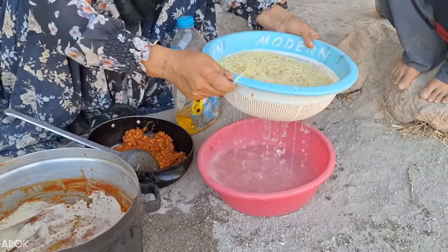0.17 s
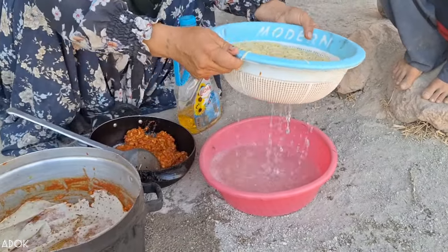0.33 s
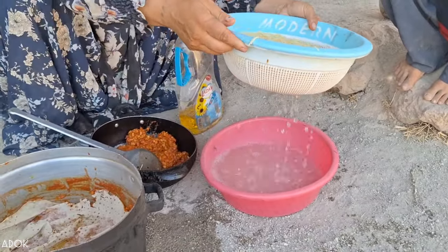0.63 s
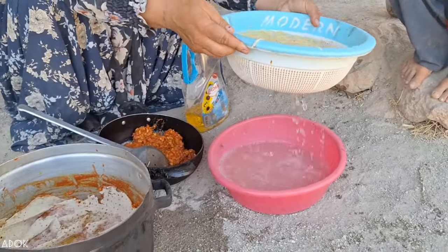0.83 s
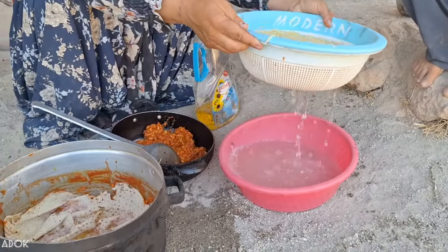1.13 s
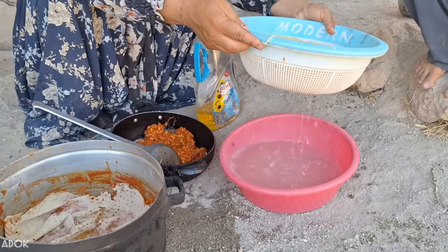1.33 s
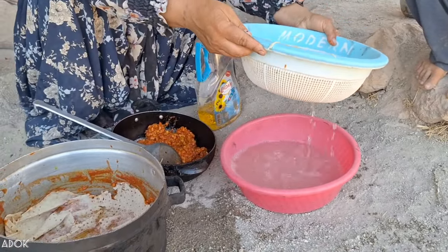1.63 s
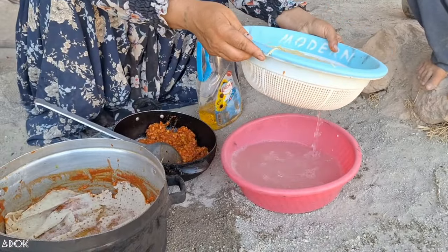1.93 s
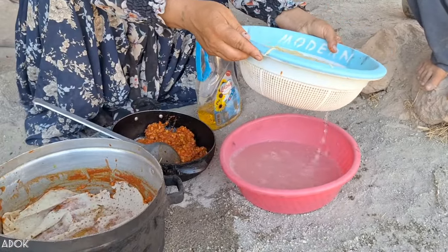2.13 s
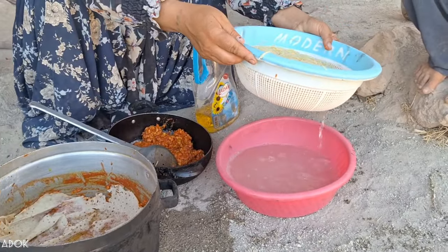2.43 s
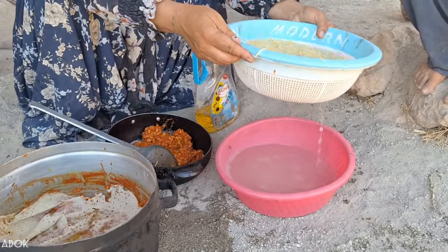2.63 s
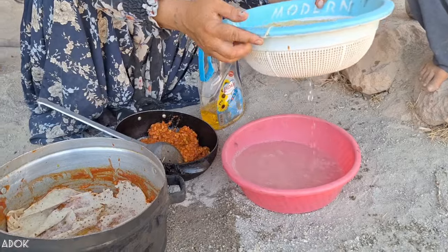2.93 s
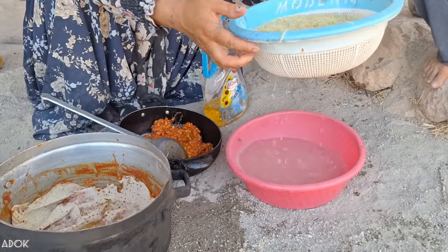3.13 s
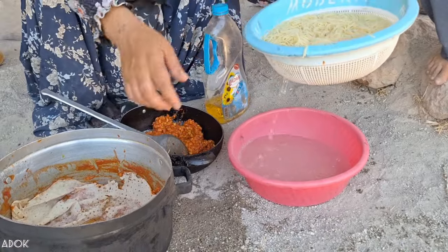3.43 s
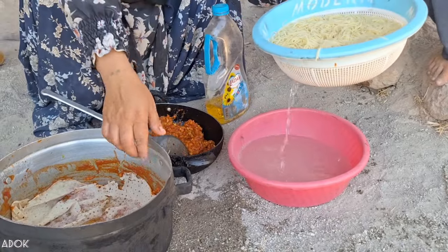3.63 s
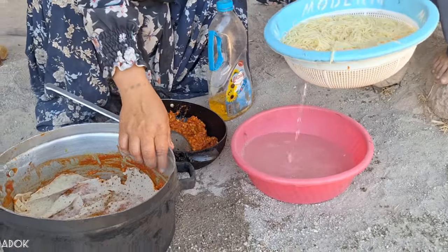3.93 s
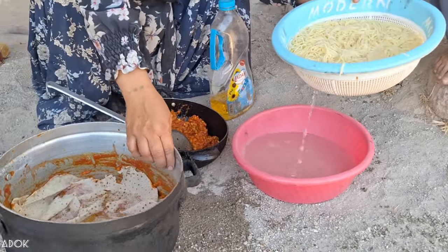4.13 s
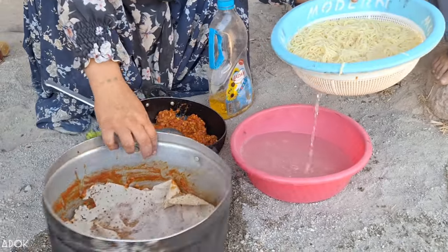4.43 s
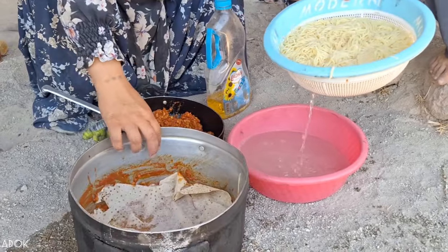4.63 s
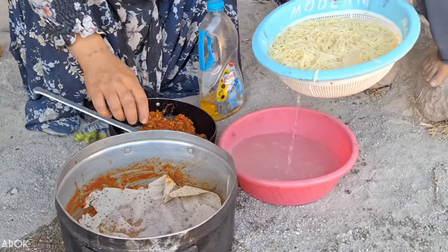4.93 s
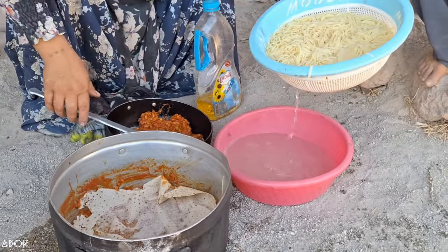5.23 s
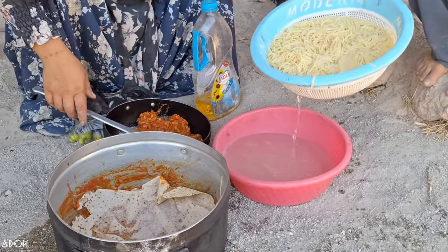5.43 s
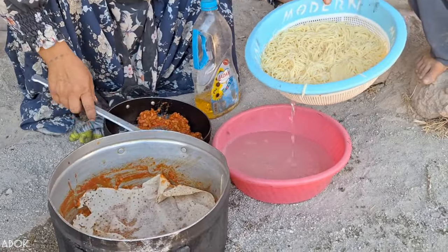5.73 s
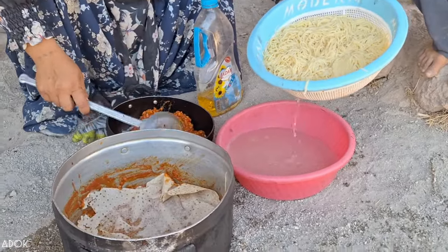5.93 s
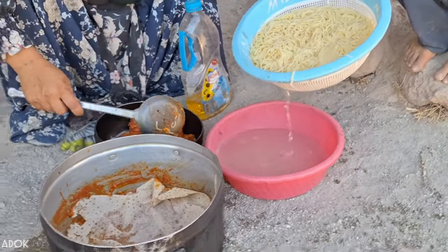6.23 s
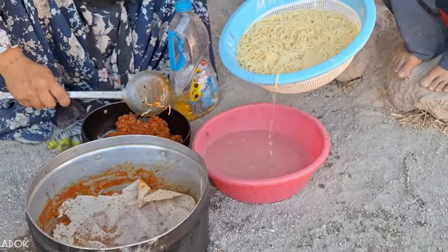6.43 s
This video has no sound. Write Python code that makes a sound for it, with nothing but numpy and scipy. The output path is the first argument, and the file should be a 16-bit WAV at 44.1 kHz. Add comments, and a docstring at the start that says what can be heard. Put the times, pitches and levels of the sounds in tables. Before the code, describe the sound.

Drops and a thin stream patter into water in a plastic basin, each with a small tick, slap and rounded bubble note. The flow weakens to a near pause, then returns as uneven drips. Midway a metal pot scrapes and jolts across grit for half a second. More plops follow, then one hard, damped ladle knock. Open air, close microphones, faint wind rumble and dull handling bumps.

```python
"""Water trickles from a colander of pasta into a plastic basin outdoors, and thins out to single drips.
Each big drop is a tick, a slap of noise and the ringing note of a trapped air bubble; random clicks make the spray.
Grinding noise and jolts ring a big aluminium pot dragged over gritty ground; near the end a ladle knocks on cookware.
Soft thumps of handling and a light breeze, made of filtered noise, buffet two closely spaced microphones."""
import sys
import numpy as np
from scipy import signal
from scipy.fft import rfft, irfft
from scipy.io import wavfile
from scipy.ndimage import uniform_filter1d

SR = 44100
rng = np.random.default_rng(int(sys.argv[2]) if len(sys.argv) > 2 else 0)


def wav_record(signal):
    """Record a signal, one row per channel, as 16-bit PCM in the file named by sys.argv[1]."""
    frames = np.transpose(np.atleast_2d(signal))
    bounded = np.clip(frames, -1, 1)
    # unit amplitude maps onto the largest positive 16-bit level
    quanta = np.round(bounded * 32767).astype(np.int16)
    wavfile.write(sys.argv[1], SR, quanta)


N = 290089
TIME = np.arange(N) / SR

# Every "level" below is a starting level; the mixing settings may still shift it.
# loudest bubbles trapped by drops: (time [s], pitch [Hz], level [dB], time to die by 60 dB [s])
BIG_BUBBLES = [(0.081, 920, -48, 0.039), (0.155, 1830, -42, 0.021), (0.193, 900, -48, 0.038),
               (0.265, 930, -41.5, 0.031), (0.3, 944, -38.5, .028), (0.325, 820, -44, 0.034),
               (0.34, 927, -34, 0.021), (0.424, 2090, -37, .016), (0.446, 986, -32.5, 0.05),
               (0.603, 595, -39, 0.046), (0.62, 567, -39.5, 0.063), (0.662, 720, -37.5, 0.07),
               (0.701, 824, -31, 0.03), (0.715, 626, -32.5, 0.029), (0.741, 870, -45, 0.029),
               (0.752, 2786, -38.5, 0.0097), (0.938, 1190, -34, 0.019), (1.011, 912, -42, 0.025),
               (1.071, 940, -40.5, 0.026), (1.098, 903, -34, 0.031), (1.163, 636, -42.5, 0.041),
               (1.24, 1870, -32.5, 0.013), (1.294, 785, -38, 0.025), (1.339, 635, -37.5, 0.031),
               (1.489, 906, -42, 0.042), (1.578, 1290, -43, 0.015), (1.612, 2140, -36.5, 0.016),
               (1.691, 1067, -41, 0.014), (1.792, 548, -41, 0.036), (1.937, 606, -41, 0.033),
               (2.013, 601, -43.5, 0.062), (2.016, 920, -43.5, 0.041), (2.054, 595, -38.5, 0.036),
               (2.173, 1265, -35.5, 0.016), (2.258, 1650, -39, 0.017), (2.29, 1336, -36.5, 0.01),
               (2.581, 1010, -35, 0.016), (3.224, 838, -40, 0.055), (3.253, 817, -39.5, 0.05),
               (3.905, 1350, -40.5, 0.013), (3.927, 715, -37, 0.024), (3.938, 855, -38.5, .022),
               (4.676, 666, -38, 0.087), (4.703, 2536, -34.5, 0.018), (4.804, 677, -41.5, 0.12),
               (4.859, 680, -44.5, 0.046), (4.96, 531, -42.5, 0.063), (4.989, 505, -45, 0.1),
               (5.022, 673, -42.5, 0.04), (5.035, 562, -41, 0.059), (5.124, 1000, -41, 0.032),
               (5.215, 1970, -44, 0.021), (5.415, 1005, -40.5, 0.034), (5.451, 890, -35, 0.02),
               (5.508, 1016, -37.5, 0.019), (5.616, 760, -40, 0.041), (5.659, 710, -36, 0.039),
               (5.729, 890, -42.5, 0.023), (5.757, 829, -37.5, 0.049), (5.926, 881, -36.5, 0.03),
               (5.932, 2740, -42, 0.019), (6.002, 820, -40.5, 0.019), (6.006, 540, -41.5, 0.055),
               (6.166, 1032, -52, 0.051), (6.228, 2020, -42.5, 0.022), (6.301, 1835, -42, 0.014),
               (6.328, 1610, -39, 0.012), (6.436, 984, -46, 0.08), (6.536, 830, -42, 0.038)]
# bubbles that chirp upwards: (time [s], first pitch [Hz], last pitch [Hz], level [dB])
RISING_CHIRPS = [(0.26, 1650, 2650, -37.5), (2.122, 1920, 3400, -41), (5.218, 1780, 2260, -35.5),
                 (5.756, 1595, 2630, -32.5)]
# hardest slaps on the water: (time [s], level [dB], pitch of their note [Hz], level of the contact tick [dB])
WATER_SLAPS = [(0.1847, -35.5, 3300, -43), (0.246, -43.0, 5320, -48), (0.6504, -42, 2730, -42),
               (0.8609, -38.5, 5750, -48), (1.1921, -39.5, 5520, -45), (1.241, -37, 6442, -55),
               (2.1287, -43.5, 7000, -54), (2.145, -43.5, 7500, -45), (2.2905, -47, 7500, -36.5),
               (2.5711, -51.5, 6700, -37), (3.323, -46, 2900, -37.5), (3.3776, -44.5, 2880, -52),
               (3.6334, -43, 4700, -32.5), (3.7644, -44, 3290, -47), (4.021, -43.5, 4940, -61),
               (4.5956, -32.5, 4240, -55.5), (4.6639, -38, 3330, -50), (4.8196, -47.0, 7300, -52.5),
               (4.9028, -41, 6720, -51.5), (4.9798, -37.5, 4700, -59), (5.1476, -38, 2640, -46.5),
               (5.189, -41.0, 2630, -59.5), (5.2286, -39.5, 6670, -65), (5.35, -41, 3300, -46),
               (5.45, -42.5, 3100, -41.5), (5.5854, -49.5, 5750, -43), (5.6605, -49.5, 4770, -59),
               (5.682, -45, 2880, -43), (5.6972, -49.5, 4380, -58), (5.812, -47.5, 4320, -42),
               (6.045, -45.5, 5080, -57), (6.0698, -42.5, 4900, -33), (6.2261, -38.5, 3380, -61),
               (6.4135, -46.5, 3650, -66.5)]
# strength of the trickle, which almost stops while the colander is held level: (time [s], level [dB])
TRICKLE_CURVE = [(0.0, -57), (0.3, -51.5), (0.58, -57.5), (0.72, -55), (0.85, -62), (0.87, -52),
                 (1.16, -66), (1.27, -53.5), (1.9, -59), (2.45, -60), (2.75, -59), (3.0, -62), (3.13, -77),
                 (3.55, -77.5), (3.68, -63.5), (3.95, -61), (4.85, -67.5), (5.2, -63.5), (5.6, -71),
                 (6.5, -71.5)]
# colour of the spray: (frequency [Hz], relative level per Hz [dB])
SPRAY_COLOUR = [(300, -12), (700, 4.5), (2000, -9.5), (4000, -3), (7000, -5), (8500, -11), (15000, -10.5)]
# small bubbles by size:
# (lowest pitch [Hz], highest pitch [Hz], ringing [cycles], level [dB], rate at a middling flow [per s])
SMALL_BUBBLES = [(638, 1360, 20, -4, 98), (1470, 2760, 29.5, -4.5, 280), (3176, 7620, 26, -6.5, 180)]
# low bubbles churned up by one thin rope of water from the tilted colander:
# (start [s], end [s], top level of a bubble [dB])
WATER_ROPE = (4.66, 5.16, -46.5)
# grinding as the pot is dragged: (time [s], level [dB])
DRAG_CURVE = [(4.07, -65), (4.14, -50), (4.21, -49.5), (4.28, -43.5), (4.325, -39.5), (4.375, -42.5),
              (4.4, -39.5), (4.43, -40), (4.48, -35), (4.52, -30.5), (4.55, -41.5), (4.56, -34),
              (4.595, -41.5), (4.64, -64.5)]
# the pot catching on stones: (time [s], level [dB], centre of the crunch [Hz])
STONE_BUMPS = [(4.142, -40, 570), (4.323, -35, 2200), (4.394, -30.5, 542), (4.477, -32, 1420),
               (4.516, -24.5, 694), (4.522, -28, 860), (4.5551, -25.5, 1890), (4.581, -33.5, 1350)]
# notes of the pot: (frequency [Hz], level [dB], time to die by 60 dB, before stretching [s])
POT_MODES = [(242, -4, .10), (490, -4, .16), (600, -7, .12), (744, 1, .12), (844, 1, .13), (931, 0, .13),
             (1125, -3, .12), (1288, -5, .12), (1424, 0, .14), (1466, -3, .10), (1517, 0, .14),
             (1722, -2, .14), (2034, -5, .12), (2599, -9, .10), (3206, -11, .10)]
# colour of the grinding: (frequency [Hz], relative level per Hz [dB])
GRIND_COLOUR = [(150, -1.5), (330, -2.5), (550, 18.5), (900, 12), (1600, 3), (3000, -1.5), (5000, -8),
                (9000, -30)]
# colour of the grit and of the ladle's crack: (frequency [Hz], relative level per Hz [dB])
GRIT_COLOUR = [(1500, 10), (3000, -3), (4500, 2.5), (6800, -2.5), (8500, -11.5), (15500, -18)]
# ladle knocks: (time [s], level [dB])
LADLE_KNOCKS = [(6.5652, -17)]
# notes that a knock rings: (frequency [Hz], level [dB], time to die by 60 dB [s])
LADLE_MODES = [(197.4, -8.5, 0.045), (437, -4, 0.027), (495, -7, 0.31), (730, -9.5, 0.11),
               (996, 3.5, 0.037), (1135, 4.5, 0.018), (1943, -18, 0.06), (4140, -7, 0.023),
               (5950, -12, 0.011), (7430, -7, 0.019)]
# dull thumps of handling: (time [s], level [dB], pitch [Hz])
HANDLING_THUMPS = [(0.319, -35, 117), (1.038, -27.5, 148), (1.743, -33, 151), (2.634, -22, 126.6),
                   (3.727, -21.5, 120), (4.517, -14, 226)]
# light breeze between gusts: (time [s], level [dB])
BREEZE_CURVE = [(0.0, -73), (1.4, -69.5), (1.75, -56), (3.1, -57), (5.3, -52.5), (5.72, -62), (6.5, -57.5)]
# gusts on the microphones: (start [s], length [s], level [dB])
WIND_GUSTS = [(2.637, 0.019, -39.5), (2.755, 0.051, -42), (2.843, 0.079, -38.5), (3.614, 0.026, -37.5),
              (3.711, 0.068, -44), (4.138, 0.054, -44.5), (4.416, 0.037, -36), (4.463, 0.19, -38.5),
              (4.806, 0.015, -44), (4.911, 0.14, -41.5), (5.078, 0.066, -37.5), (5.208, 0.016, -36),
              (5.449, 0.052, -45), (5.85, 0.04, -50), (6.253, 0.039, -44)]
# colour of the wind buffeting: (frequency [Hz], relative level per Hz [dB])
BUFFET_COLOUR = [(20, -14), (40, -5), (65, 3.5), (110, -6.5), (180, -22.5), (300, -26), (600, -72),
                 (2500, -58)]
# colour of the still air: (frequency [Hz], relative level per Hz [dB])
AIR_COLOUR = [(40, 2), (150, 17), (350, 8.5), (900, -1.5), (2000, -6), (3500, -2), (6500, 1), (8500, -8.5),
              (15500, -7)]

# among the unlisted bubbles, one of this pitch rings this long; higher ones die sooner by a power law
PLINK_HZ, PLINK_T60_S, DAMPING_POWER = 1000, 0.023, 1.13
# a big bubble sheds a small one: middle pitch, spread, level against the big one, longest delay
SHED_HZ, SHED_OCTAVES, SHED_DB, SHED_S = 2210, 0.72, -10, 0.006
# a big drop throws up droplets that fall back: level against the drop, time in the air, time to die away
FALLBACK_DB, FALLBACK_FLIGHT_S, FALLBACK_T60_S = -17, 0.012, 0.18
SPURT_DB, SPURTS_PER_S = 3, 35  # unevenness of the stream
MIDDLING_DB = -53.5  # a middling flow
SPLASH_CUT_HZ = SR / 3  # upper limit of the splashes of single drops
CHIRP_S = 0.009
GURGLE_HZ, GURGLES_PER_S = 662, 88
JOLT_OCTAVES = 0.41  # width of a stone's crunch
LULL_DB, LULLS_PER_S = 3, 18  # unevenness of the breeze
GUST_RISE_DB_PER_S, GUST_FALL_DB_PER_S = 800, 551
AIR_DB = -67.5
CUTOFF_HZ = 15900


def basin(count, froth_db, spray_db, crowding):
    """Water lands on several spots, each with its own path and its own reflections from the basin wall."""
    flow_db = flow()
    crowd = from_db(crowding * (flow_db - MIDDLING_DB)) / count
    out = np.zeros((2, N))
    for spot in range(count):
        tones, splashes = drips(BIG_BUBBLES[spot::count], WATER_SLAPS[spot::count],
                                plink_db=1.85, slap_db=4, splash_db=7.5, snap_db=11.5,
                                smack_db=6.5, tick_db=9.5, rise=0.11, splash_t60=0.11)
        splashes += from_db(flow_db + spray_db) * grains(3000 * crowd, spread_db=11.5)
        small_bubbles = froth(flow_db, crowd, spread_db=20.5, rise=0.2)
        water = tones + coloured(splashes, SPRAY_COLOUR) + from_db(froth_db) * small_bubbles
        out += placed(water, lag_ms=0.043 + 0.033 * spot, scatter_db=2.5, scatter_t60=0.03, scatter_hz=1580)
    return out


def flow():
    """Water reaching the basin, in dB: the spurting trickle plus droplets falling back after each big drop."""
    trickle_db, = in_time(TRICKLE_CURVE)
    power = from_db(trickle_db + SPURT_DB * wander(SPURTS_PER_S)) ** 2
    t, fade = dying(FALLBACK_T60_S)
    shower = fade * (1 - np.exp(-(t / FALLBACK_FLIGHT_S) ** 2))
    drops = [(s, db) for s, hz, db, t60 in BIG_BUBBLES]
    drops += [(s, db) for s, db, hz, tick in WATER_SLAPS]
    for s, db in drops:
        add(power, s, (from_db(db + FALLBACK_DB) * shower) ** 2)
    return 10 * np.log10(power)


def drips(plinks, slaps, plink_db, slap_db, splash_db, snap_db, smack_db, tick_db, rise, splash_t60):
    """Big drops tick, slap, splash and trap ringing bubbles; gives the tones and splashes separately."""
    tones, splashes = np.zeros((2, N))
    for (s, hz, db, t60), (climb, size, wait) in zip(plinks, rng.random((len(plinks), 3))):
        shed_hz = SHED_HZ * 2 ** (SHED_OCTAVES * (size - .5))
        add(tones, s, from_db(db + plink_db) * bubble(hz, t60, rise * (.5 + 2 * climb)))
        add(tones, s + SHED_S * wait, from_db(db + plink_db + SHED_DB) * plink(shed_hz, rise))
        add(splashes, s, from_db(db + smack_db) * swell(0.0098, onset=0.00078))
    for s, db, hz, contact_db in slaps:
        # a brief, high note must be taller to carry the same energy
        height = from_db(db + slap_db) * (hz / PLINK_HZ) ** (DAMPING_POWER / 2)
        add(tones, s, height * plink(hz, rise))
        add(tones, s, from_db(contact_db + tick_db) * burst(0.00072))
        add(splashes, s - .0004, from_db(db + snap_db) * swell(0.0052, onset=0.0023))
        add(splashes, s, from_db(db + splash_db) * swell(splash_t60, onset=0.00064))
    # single drops splash more dully than the fine spray
    dull = signal.butter(1, SPLASH_CUT_HZ, fs=SR, output="sos")
    return tones, signal.sosfilt(dull, splashes)


def bubble(hz, t60, rise):
    """A trapped bubble rings and climbs in pitch as it nears the surface."""
    t, fade = dying(t60)
    onset = 1 - np.exp(-1.5 * hz * t)
    return fade * onset * np.sin(2 * np.pi * hz * t * (1 + rise * t / (2 * t60)))


def plink(hz, rise):
    """The note of one bubble: the higher it is, the sooner it dies."""
    return bubble(hz, PLINK_T60_S * (PLINK_HZ / hz) ** DAMPING_POWER, rise)


def froth(flow_db, crowd, spread_db, rise):
    """Small bubbles of every size are born at random, more often and louder in a stronger flow."""
    out = np.zeros(N)
    for low, high, cycles, db, per_s in SMALL_BUBBLES:
        draws = rng.random(size=(2400, 5))
        wanted = per_s * N / SR * crowd[(draws[:, 0] * N).astype(int)]
        born = draws[draws[:, 1] * len(draws) < wanted]
        for when, chance, smallness, loudness, lasting in born:
            at = int(when * N)
            hz = low * (high / low) ** smallness
            level = from_db(flow_db[at] + db + spread_db * (loudness - 1))
            # a short, rare bubble must be taller to carry the same power
            height = level * np.sqrt(hz / (cycles * per_s * crowd[at]))
            add(out, at / SR, height * bubble(hz, (.5 + lasting) * cycles / hz, rise))
    return out


def gurgle():
    """Soft, overlapping bubbles under the rope of water, spread over an octave."""
    start, end, db = WATER_ROPE
    length = end - start
    out = np.zeros(N)
    for when, size, strength in rng.random((int(length * GURGLES_PER_S), 3)):
        note = plink(GURGLE_HZ * 2 ** (size - .5), rise=0.13)
        add(out, start + when * length, strength * from_db(db) * note)
    return out


def chirps():
    """A bubble opens at the surface: its note swells, sweeps upwards and is gone."""
    out = np.zeros(N)
    for s, first_hz, last_hz, db in RISING_CHIRPS:
        hz = np.geomspace(first_hz, last_hz, int(CHIRP_S * SR))
        add(out, s, from_db(db) * np.hanning(len(hz)) * np.sin(2 * np.pi * np.cumsum(hz) / SR))
    return out


def dragged_pot(ring_db, grind_db, grit_db, bump_db, thud_db, ring_share, judder_db, rim_db):
    """Grit crushed under the base sets the pot ringing; it slides unevenly and larger stones give it jolts."""
    grinding_db, = in_time(DRAG_CURVE)
    moving = (TIME > DRAG_CURVE[0][0]) & (TIME < DRAG_CURVE[-1][0])
    sliding = uniform_filter1d(1. * moving, SR // 100)
    force = sliding * from_db(grinding_db + judder_db * wander(110))
    rub = scratchy(force * grains(1500, spread_db=2.0), patchy_db=3.5, per_s=29)
    jolts = np.zeros(N)
    for s, db, hz in STONE_BUMPS:
        add(jolts, s, from_db(db + bump_db) * jolt(hz, t60=0.03))
    metal = ringing_metal(rub + jolts, POT_MODES, ring_share)
    ground = coloured(from_db(grind_db) * rub, GRIND_COLOUR) + from_db(thud_db) * jolts
    # grains crack all round the wide rim, so each microphone hears its own share of them
    cracks = force * np.array([grains(600, spread_db=1.0) for side in "LR"])
    # fine grit hisses, coarse grit crunches
    hiss = from_db(grit_db) * coloured(cracks + apart(rub, lag_ms=-0.069), GRIT_COLOUR)
    crunch = from_db(rim_db) * coloured(cracks, GRIND_COLOUR)
    return apart(from_db(ring_db) * metal + ground, lag_ms=-0.065) + hiss + crunch


def scratchy(x, patchy_db, per_s):
    """Pitch bands surge and fade separately as grains of different sizes catch under the base."""
    out, rest = 0, x
    for hz in 700 * 2 ** np.arange(5):  # upper edge of each band; what lies above the last stays steady
        lowpass = signal.butter(3, hz, fs=SR, output="sos")
        band = signal.sosfiltfilt(lowpass, rest + 1e-18)
        out = out + band * from_db(patchy_db * wander(per_s))
        rest = rest - band
    return out + rest


def jolt(hz, t60):
    """A stone catches: a short crunch, dull or bright by how hard it is; unit energy."""
    edges = hz * 2 ** (JOLT_OCTAVES * np.array([-.5, .5]))
    bandpass = signal.butter(1, edges, "band", fs=SR, output="sos")
    crunch = signal.sosfilt(bandpass, swell(t60, onset=0.00065))
    return crunch / np.linalg.norm(crunch)


def ladle(ring_db, crack_db, lag_ms):
    """A hard contact, quickly damped by the food; its crack reaches each microphone differently."""
    blows, cracks = np.zeros(N), np.zeros((2, N))
    for s, db in LADLE_KNOCKS:
        add(blows, s, from_db([db + ring_db]))
        for side in cracks:
            add(side, s, from_db(db + crack_db) * burst(0.11))
    return apart(ringing_metal(blows, LADLE_MODES, 1), lag_ms) + coloured(cracks, GRIT_COLOUR)


def ringing_metal(force, modes, stretch):
    """A force rings all the notes of a metal body, with alternating signs; stretch scales the ring times."""
    return sum((-1) ** k * from_db(db) * ring(force, hz, t60 * stretch)
               for k, (hz, db, t60) in enumerate(modes))


def ring(force, hz, t60):
    """A unit click sets a sine of height 1 ringing and dying away."""
    r, w = from_db(-60 / (t60 * SR)), 2 * np.pi * hz / SR  # loss and turn per sample
    return signal.lfilter([0, np.sin(w)], [1, -2 * r * np.cos(w), r * r], force + 1e-18)


def thumps(cycles):
    """Soft, low bumps of handling that swell and die within a few cycles."""
    out = np.zeros(N)
    for s, db, hz in HANDLING_THUMPS:
        add(out, s, from_db(db) * bubble(hz, cycles / hz, rise=0.027))
    return out


def breeze(left_db, right_db, shared):
    """Eddies at each microphone port, partly common to both; breeze and gusts set their strength."""
    eddies = coloured(rng.standard_normal((2, N)) + shared * rng.standard_normal(N), BUFFET_COLOUR)
    # even out the noise so that the wind curve sets its level
    eddies /= np.sqrt(uniform_filter1d(np.mean(eddies ** 2, axis=0), SR // 14) + 1e-9)
    return from_db(wind_db(gust_db=0.0)) * eddies * from_db([[left_db], [right_db]])


def wind_db(gust_db):
    """Each gust rises out of the unsteady breeze, holds and falls back."""
    level = in_time(BREEZE_CURVE)[0] + LULL_DB * wander(LULLS_PER_S)
    for s, length, db in WIND_GUSTS:
        rise = GUST_RISE_DB_PER_S * (s - TIME)
        fall = GUST_FALL_DB_PER_S * (TIME - s - length)
        fade = np.maximum(rise, fall)
        level = np.maximum(level, db + gust_db - np.maximum(fade, 0))
    return level


def still_air(shared):
    """Steady coloured noise, partly common to both microphones."""
    noise = rng.standard_normal((2, N)) + shared * rng.standard_normal(N)
    return from_db(AIR_DB) * coloured(noise, AIR_COLOUR)


def placed(x, lag_ms, scatter_db, scatter_t60, scatter_hz):
    """The direct sound, plus nearby surfaces that scatter the treble differently to each microphone."""
    bright = signal.sosfilt(signal.butter(1, scatter_hz, "high", fs=SR, output="sos"), x)
    echoes = np.array([signal.oaconvolve(bright, burst(scatter_t60))[:N] for side in "LR"])
    return apart(x, lag_ms) + from_db(scatter_db) * echoes


def apart(x, lag_ms, size=16):
    """Two microphones: the left hears lag_ms later than the right."""
    taps = np.arange(-size, size + 1)
    shift = lag_ms * SR / 2000  # half the lag, in samples, for each side
    window = np.hanning(len(taps))
    return np.array([np.convolve(x, np.sinc(taps - d) * window, "same") for d in (shift, -shift)])


def coloured(x, spectrum, size=8192):
    """Causal (minimum-phase) filter with the given spectrum and unit power gain."""
    hz, db = np.transpose(spectrum)
    bins = np.maximum(np.fft.rfftfreq(size, 1 / SR), 2)
    below = np.minimum(bins / hz[0], 1) ** 2  # fall-off under the lowest row
    gain = rms_one(below * from_db(np.interp(np.log(bins), np.log(hz), db)))
    cepstrum = irfft(np.log(gain))[:size // 2]
    cepstrum[1:] *= 2
    response = irfft(np.exp(rfft(cepstrum, size)))
    return signal.oaconvolve(x, np.array(response, ndmin=x.ndim), axes=-1)[..., :N]


def grains(per_s, spread_db):
    """Random clicks of uneven size, with even mean power."""
    at = np.flatnonzero(rng.random(N) < per_s / SR)
    size, sign = np.resize(rng.random((SR // 2, 2)), (len(at), 2)).T
    clicks = np.zeros(N)
    uneven_db = spread_db * np.minimum(-np.log1p(-size), np.pi)  # mostly small, a few large
    clicks[at] = from_db(uneven_db) * np.sign(sign - .5)
    return rms_one(clicks / np.sqrt(per_s))


def swell(t60, onset):
    """A puff of noise that takes a moment to build up; unit energy."""
    puff = burst(t60)
    puff = puff * (1 - np.exp(-(np.arange(len(puff)) / SR / onset) ** 2))
    return puff / np.linalg.norm(puff)


def burst(t60):
    """A puff of noise that dies away; unit energy."""
    t, fade = dying(t60)
    puff = rng.standard_normal(len(t)) * fade
    return puff / np.linalg.norm(puff)


def dying(t60):
    """Times and envelope of a decay by 60 dB in t60 seconds."""
    t = np.arange(int(t60 * SR) + 2) / SR
    return t, np.exp(-np.log(1000) * t / t60)


def wander(per_s):
    """Slow random drift with a spread of 1: noise averaged over 1/per_s seconds."""
    return rms_one(uniform_filter1d(rng.standard_normal(N), int(SR / per_s)))


def in_time(rows):
    """Each column of a curve at every sample."""
    s, *columns = np.transpose(rows)
    return [np.interp(TIME, s, c) for c in columns]


def add(track, s, sound):
    """Mix a sound in at time s."""
    at = int(np.clip(round(s * SR), 0, N - 1))
    track[at:at + len(sound)] += sound[:N - at]


def from_db(db):
    """Decibels to gain."""
    return 10 ** (np.asarray(db) / 20)


def rms_one(x):
    """Scale to unit rms (average strength)."""
    return x / np.sqrt(np.mean(x ** 2) + 1e-20)


def scene():
    """Basin and ladle reach the right microphone first, the pot mostly the left; open air lies around."""
    out = basin(count=3, froth_db=17, spray_db=-10.5, crowding=0.94)
    out += apart(gurgle() + chirps(), lag_ms=0.082)
    out += dragged_pot(ring_db=-38.5, grind_db=-2.0, grit_db=-6.5, bump_db=15.0, thud_db=5.0,
                       ring_share=1.07, judder_db=2.0, rim_db=-6.5)
    out += ladle(ring_db=0.0, crack_db=19.5, lag_ms=0.04)
    out += thumps(cycles=3.86)
    out += breeze(left_db=-3.5, right_db=5.5, shared=0.36)
    return out + still_air(shared=0.5)


def record(dry):
    """The right microphone is a little brighter, the left slightly duller; the very top is cut."""
    treble = signal.sosfilt(signal.butter(1, 11000, "high", fs=SR, output="sos"), dry)
    sheen = treble * [[-.1], [.4]]
    top_cut = signal.ellip(10, .2, 70, CUTOFF_HZ, fs=SR, output="sos")
    return signal.sosfilt(top_cut, dry + sheen)


dry = scene()
out = record(dry)
wav_record(out)
```